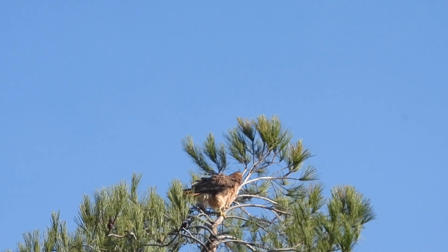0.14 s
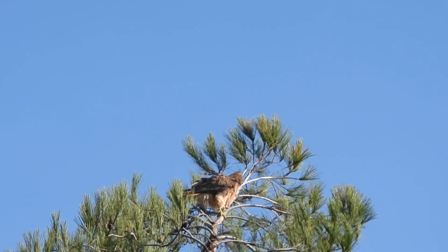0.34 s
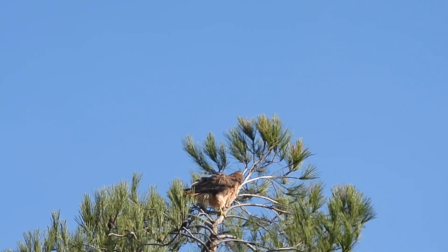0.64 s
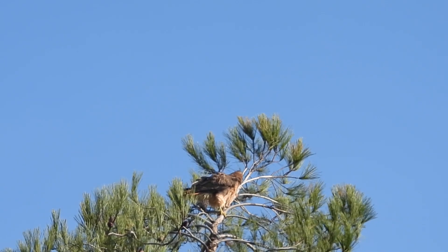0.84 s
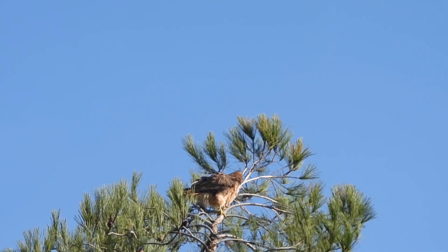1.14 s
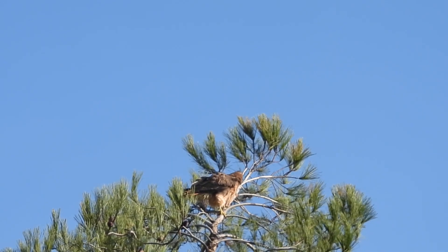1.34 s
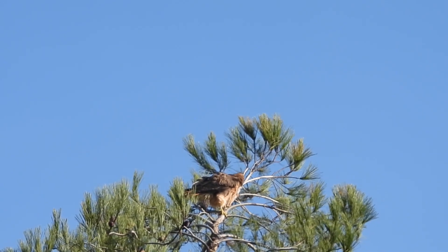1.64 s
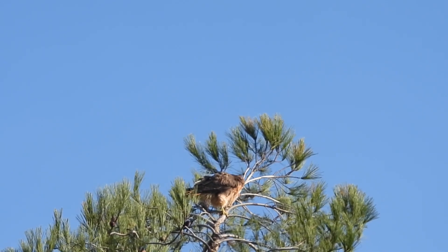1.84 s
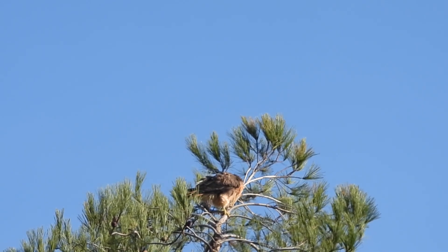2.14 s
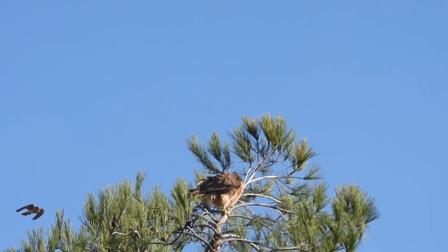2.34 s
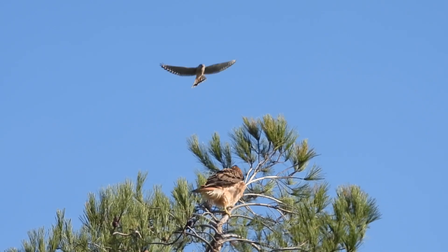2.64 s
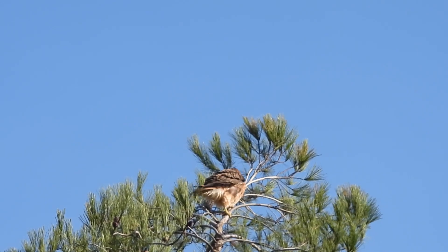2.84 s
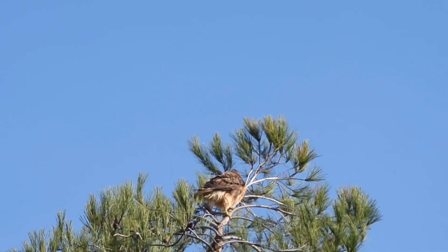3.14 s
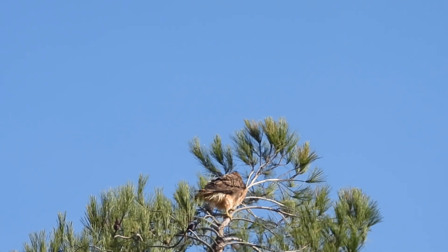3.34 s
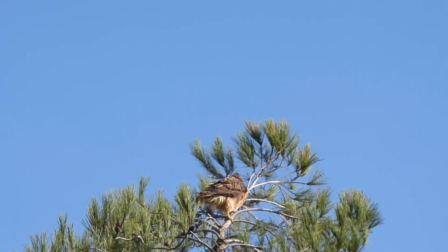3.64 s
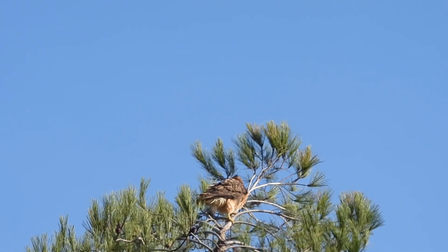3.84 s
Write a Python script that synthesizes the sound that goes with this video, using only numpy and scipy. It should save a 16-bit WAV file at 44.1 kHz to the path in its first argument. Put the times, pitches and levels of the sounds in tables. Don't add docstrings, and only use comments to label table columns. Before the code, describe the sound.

Small falcon calling in fast, shrill two-note phrases after sparse bird chirps, over low wind roar

```python
import sys
import numpy as np
from scipy import signal
from scipy.io import wavfile
from scipy.ndimage import uniform_filter1d

SR = 44100
rng = np.random.default_rng(int(sys.argv[2]) if len(sys.argv) > 2 else 0)


def pcm_store(signal):
    levels = np.round(np.clip(np.atleast_2d(signal), -1, 1) * 32767)
    wavfile.write(sys.argv[1], SR, levels.astype(np.int16).T)


def magnitude_from_level(level_db):
    exponent = np.asarray(level_db, float) / 20
    return 10 ** exponent


N = 176400
ROUGH_JITTER = 0.028


def in_time(rows):
    s, *columns = np.transpose(rows)
    return [np.interp(np.arange(N) / SR, s, c) for c in columns]


def at_hz(points, hz):
    table_hz, value = np.transpose(points)
    return np.interp(np.log(hz), np.log(table_hz), value)


def rms_one(x):
    return x / np.sqrt(np.mean(x ** 2) + 1e-20)


def pan(db):
    return magnitude_from_level(np.array([[.5], [-.5]]) * db)


def drift(rate_hz):
    r = np.exp(-2 * np.pi * rate_hz / SR)
    return rms_one(signal.lfilter([1], [1, -2 * r, r * r], rng.standard_normal(N + SR))[SR:])


def gate(t, start, end, attack_s, release_s):
    return np.clip((t - start) / attack_s, 0, 1) * np.clip((end - t) / release_s, 0, 1)


def resonate(x, hz, width_hz):
    r = np.exp(-np.pi * width_hz / SR)
    return signal.lfilter([1, 0, -1], [1, -2 * r * np.cos(2 * np.pi * hz / SR), r * r], x) * (1 - r * r) / 2


def lowpass(x, hz):
    return signal.sosfilt(signal.butter(2, hz, fs=SR, output="sos"), x)


def banded_noise(spectrum, patchy_db, rate, together):
    # (frequency [Hz], correlation [-1..1])
    likeness = [(60, 0.98), (180, 0.97), (540, 0.86), (1610, 0.79), (4800, -0.42), (14400, 0.13)]
    out = 0
    band_edges = 35 * 2 ** np.arange(0, 8.9, 1 / 2.5)
    white = rng.standard_normal((2, 2, N))
    gust = drift(2.5)
    flicker = [drift(rate) for _ in range(4)]
    for k, (low, high) in enumerate(zip(band_edges, band_edges[1:])):
        band = signal.butter(2, [low, high], "band", fs=SR, output="sos")
        mid, side = signal.sosfilt(band, white[k % 2])
        hz = np.sqrt(low * high)
        alike = np.clip(at_hz(likeness, hz), -1, 1)
        stereo = np.sqrt(1 + alike) * mid + np.sqrt(1 - alike) * side * [[1], [-1]]
        level_db = at_hz(spectrum, hz) + patchy_db * (together * gust + flicker[k % 4])
        out = out + magnitude_from_level(level_db) * stereo
    return rms_one(out)


def glides(rows, jitter, hoarse):
    out, t = np.zeros(N), np.arange(N) / SR
    rasp = drift(290)
    shake = 1 + jitter * drift(198.0)
    for k, (s, length, from_hz, to_hz, level_db) in enumerate(rows):
        u = np.clip((t - s) / length, 0, 1)
        phase = 2 * np.pi * np.cumsum((from_hz + (to_hz - from_hz) * u) * shake) / SR
        swell = np.sin(np.pi * u) ** 0.33
        broken = 1 - hoarse + hoarse * np.roll(rasp, k * SR // 10)
        out += magnitude_from_level(level_db + 9.5) * swell * broken * np.sin(phase)
    return out


def echo(x, t60, level_db):
    start_s, cut_hz = 0.0014, 16300
    t = np.arange(SR) / SR
    tail = rng.standard_normal((2, SR)) * magnitude_from_level(-60 * t / t60) * np.clip(t / start_s - 1, 0, 1)
    tail = tail / np.sqrt(np.sum(tail ** 2) / 2)
    shimmer_db = 3 * drift(70)
    returns = signal.fftconvolve(lowpass(x, cut_hz)[None], tail, axes=1)[:, :N]
    return magnitude_from_level(level_db + shimmer_db) * returns


def arch_note(row, t):
    top_at, rise, fall = .45, .08, .11
    flutter_hz, flutter_from = 230, .62
    s, length, hz = row[:3]
    u = (t - s) / length
    rising = rise * (1 - u / top_at) ** 2
    falling = fall * ((u - top_at) / (1 - top_at)) ** 2
    bend = np.where(u < top_at, rising, falling)
    beat = np.sin(np.pi * flutter_hz * (t - s - flutter_from * length)) ** 2
    flutter = 1 - np.clip((u - flutter_from) * 6, 0, 1) * .8 * beat
    swell = np.interp(u, [0, .3, .6, 1], [0.55, 0.75, 1, 0.46])
    envelope = gate(t, s, s + length, 0.0019, 0.0035) * swell * flutter
    shake = .004 + ROUGH_JITTER * np.clip(4 * u - 3, 0, 1)
    return hz * (1 - np.minimum(bend, .3)), envelope, shake


def hold_note(row, t):
    climb_s, flip_s, drop_s = .015, .0015, .008
    climb_from_hz, climb_to_hz, drop_to_hz = 2330, 2600, 2250
    climb_db, drop_db, drop_end_db = -5, -9, -6
    s, length, hz = row[:3]
    sagged_hz = hz * (1 - .012)
    at = s + np.array([-climb_s, -flip_s, 0, 0.35 * length, length, length + flip_s, length + drop_s])
    pitch = np.interp(t, at, [climb_from_hz, climb_to_hz, sagged_hz, hz, sagged_hz, climb_to_hz, drop_to_hz])
    level_db = np.interp(t, at, [climb_db + 4.5, climb_db, -.8, 0, -1.5, drop_db, drop_end_db])
    steady, rough = .004, ROUGH_JITTER
    shake = np.interp(t, at, [.5 * rough, 0.19 * rough, steady, steady, steady, .5 * rough, rough])
    return pitch, magnitude_from_level(level_db) * gate(t, at[0], at[-1], 0.0037, 0.0013), shake


def squeak(row, t):
    s, length, from_hz, to_hz = row[:4]
    pitch = from_hz + (to_hz - from_hz) * np.clip((t - s) / length, 0, 1)
    return pitch, gate(t, s, s + length, 0.0011, 0.0013), 0.34 * ROUGH_JITTER


def falcon():
    # (start [s], length [s], top pitch [Hz], level [dB], pan [dB])
    arches = [
        (2.895, 0.049, 2512, -12, 2.5),
        (3.253, 0.041, 2556, -15, 2.5),
        (3.431, 0.043, 2414, -18, 1.5),
        (3.602, 0.032, 2382, -16, -2.5),
        (3.77, .043, 2370, -14.5, -2),
        (3.951, 0.035, 2344, -14, 2),
    ]
    # (flip [s], hold [s], held pitch [Hz], level [dB], pan [dB])
    holds = [
        (2.962, 0.035, 2851, -15.5, -2),
        (3.09, 0.016, 2900, -15.5, -2),
        (3.138, 0.033, 2880, -16.5, -2.1),
        (3.316, 0.031, 2863, -17, -1),
        (3.495, 0.023, 2852, -16.5, 1.5),
        (3.664, .025, 2850, -15.5, 5.5),
        (3.845, 0.011, 2827, -20, -3),
        (4.008, 0.058, 2700, -22.5, 7.5),
    ]
    # (start [s], length [s], from [Hz], to [Hz], level [dB])
    squeaks = [(2.94, 0.0079, 2920, 2750, -29.5), (3.077, 0.01, 2400, 2600, -25),
               (3.11, 0.0174, 2453, 2180, -26), (3.291, 0.019, 3050, 3290, -26),
               (3.288, .014, 2420, 2530, -34), (3.471, 0.0143, 2980, 3240, -24.5),
               (3.64, 0.014, 3060, 3160, -23.5), (3.636, 0.022, 2160, 2350, -27),
               (3.814, 0.0148, 2250, 2630, -20), (3.828, 0.0077, 2800, 3240, -17.5),
               (3.837, 0.0102, 3190, 2870, -18), (3.843, 0.021, 2422, 2320, -23.5),
               (3.992, 0.0089, 3100, 3300, -21)]
    # (start [s], length [s], from [Hz], to [Hz], level [dB])
    breaks = [(3.076, .006, 5900, 6100, -38), (3.255, .007, 5900, 6150, -32),
              (3.244, .007, 3500, 3650, -47), (3.434, .006, 5800, 6000, -36),
              (3.424, .006, 3500, 3600, -46), (2.934, .012, 3200, 3600, -43),
              (3.283, .016, 3050, 3700, -45), (3.461, .014, 3000, 3750, -45),
              (3.632, .014, 3000, 3900, -44), (3.98, .006, 3600, 3250, -40), (3.985, .008, 3250, 3950, -39),
              (3.62, .006, 3600, 3300, -48), (3.795, .006, 3600, 3300, -48), (3.812, .007, 2900, 3700, -46)]
    # (frequency [Hz], level [dB])
    throat = [(2300, -22), (3200, -16), (4300, -3), (5700, 1), (7300, -16), (8600, -22), (9800, -22.5),
              (11300, -46.5)]
    tone_lead_s, low_pan_db = .0105, 4.5
    out, effort = np.zeros((2, N + SR)), np.zeros(N + SR)
    jitter, wobble, air = drift(224), drift(73), drift(1000)
    fray = np.array([drift(200), drift(250)])
    for voice, rows in ((arch_note, arches), (hold_note, holds), (squeak, squeaks)):
        for row in rows:
            i = int((row[0] - .05) * SR) + np.arange(SR // 8)
            level_db, pan_db = (row[4], 0) if voice is squeak else row[3:5]
            pitch, shape, shake = voice(row, i / SR)
            phase = 2 * np.pi * np.cumsum(pitch * (1 + shake * jitter[i % N])) / SR
            unsteady = magnitude_from_level(.7 * wobble[i % N]) + magnitude_from_level(-37) * air[i % N] * 4
            level = shape * unsteady * magnitude_from_level(level_db + 2.0)
            effort[i] += shake / ROUGH_JITTER * shape * magnitude_from_level(level_db)
            for k in range(1, 6):
                lowest = k == 1
                upper = max(k - 2, 0)
                frail = shape ** (.5 * upper) * magnitude_from_level(1.8 * upper * fray[:, (i + 999 * k) % N])
                side = pan(pan_db) * pan(low_pan_db * lowest)
                partial = level * frail * magnitude_from_level(at_hz(throat, k * pitch)) * np.sin(k * phase)
                out[:, i - int(tone_lead_s * SR) * lowest] += side * partial
    rasp_colour = [(1500, -60), (3500, -34), (5000, 2), (7000, 1), (10000, -14), (15000, -50)]   # (Hz, dB)
    rasp = banded_noise(rasp_colour, patchy_db=4.0, rate=60.0, together=0.33)
    rasp_level = magnitude_from_level(-27 + 12.5) * uniform_filter1d(effort[:N], int(.008 * SR))
    out = out[:, :N] + glides(breaks, jitter=0.00823, hoarse=0.21) + rasp_level * rasp
    return pan(0.5) * (out + echo(out.mean(axis=0), t60=0.39, level_db=-5))


def chirps():
    # (start [s], length [s], from [Hz], to [Hz], level [dB])
    chirp_rows = [(0.422, 0.06, 3400, 4310, -57.5), (0.455, 0.038, 3850, 3030, -49.5),
                  (.484, 0.02, 3100, 2250, -54), (0.504, 0.017, 3650, 4430, -37.5),
                  (.479, 0.02, 3550, 3860, -48), (0.519, 0.011, 3800, 3940, -33.5),
                  (.496, 0.021, 2950, 3480, -48), (.503, 0.0094, 4700, 4400, -47),
                  (.528, 0.02, 3600, 3250, -51), (.534, 0.023, 2650, 2450, -58),
                  (.542, 0.014, 3600, 4100, -55), (0.897, 0.031, 3100, 4270, -57.5),
                  (0.916, 0.037, 3910, 3826, -47.5), (.948, 0.034, 3870, 4400, -56),
                  (1.515, 0.031, 2900, 2840, -41), (1.51, 0.11, 3560, 3600, -51),
                  (1.8, 0.027, 3500, 4000, -61), (1.826, 0.03, 3900, 4760, -57),
                  (1.843, 0.054, 3300, 3394, -57), (1.868, 0.038, 2950, 3260, -57),
                  (2.0, 0.048, 3750, 3640, -65), (1.57, 0.081, 2900, 2885, -53.5),
                  (2.402, 0.021, 4800, 5700, -49.5), (2.424, 0.021, 5700, 7560, -49.5),
                  (2.024, 0.028, 5600, 4840, -64), (2.15, 0.11, 4800, 5000, -72),
                  (1.235, .04, 3850, 3950, -60), (2.452, .012, 4000, 4400, -44),
                  (2.384, .014, 3800, 4030, -57), (2.393, 0.029, 2400, 3090, -41),
                  (2.398, 0.034, 3160, 3500, -42), (2.42, 0.018, 3250, 3840, -27),
                  (2.443, 0.015, 3750, 4030, -34.5)]
    return glides(chirp_rows, jitter=0.00976, hoarse=0.25)


def twig_ticks():
    # (time [s], resonance [Hz], level [dB])
    tick_rows = [
        (.298, 2650, -29.5),
        (.307, 5070, -33),
        (1.673, 5700, -34.5),
        (1.998, 7460, -54),
    ]
    out = np.zeros(N)
    for s, hz, level_db in tick_rows:
        impulse = (np.arange(N) == int(s * SR)) + 1e-18
        out += magnitude_from_level(level_db + 23.0) * resonate(resonate(impulse, hz, 0.11 * hz), hz, 0.59 * hz)
    return out


def harsh_buzz(hiss):
    # (time [s], level [dB])
    buzz_level = [
        (1.25, -64),
        (1.3, -41),
        (1.35, -33),
        (1.42, -32.5),
        (1.491, -31.5),
        (1.539, -29),
        (1.585, -48),
        (1.68, -57),
        (1.78, -73),
    ]
    # (start [s], length [s], from [Hz], to [Hz], level [dB])
    streaks = [(1.27, 0.1, 2500, 2900, -45), (1.26, 0.086, 2900, 4200, -49), (1.28, .14, 1800, 2250, -49.5),
               (1.33, .1, 3400, 4450, -41), (1.42, 0.09, 4400, 4950, -38.5),
               (1.3, 0.066, 2600, 3100, -47.5), (1.385, 0.054, 6700, 5800, -41.5),
               (1.385, 0.026, 8100, 8530, -45.5), (1.31, 0.096, 8300, 7200, -46),
               (1.499, 0.0744, 5800, 6000, -39.5), (1.535, 0.04, 3700, 4800, -35.5)]
    t = np.arange(N) / SR
    level_db, = in_time(buzz_level)
    rasp = hiss * magnitude_from_level(0.5 * drift(70))
    buzz = magnitude_from_level(level_db) * gate(t, buzz_level[0][0], buzz_level[-1][0], .01, .01) * rasp
    return pan(1.5) * (buzz + glides(streaks, jitter=.007, hoarse=.7))


def rustle(hiss):
    # (start [s], length [s], level [dB])
    puffs = [
        (0.28, 0.08, -51.5),
        (0.461, 0.1, -54.5),
        (1.956, .06, -69),
        (2.395, 0.077, -47.5),
    ]
    t = np.arange(N) / SR
    level = sum(magnitude_from_level(db) * gate(t, s, s + length, 0.28 * length, 0.4 * length) for s, length, db in puffs)
    return np.diff(hiss, prepend=0) * level


def small_birds():
    # (frequency [Hz], density [dB per Hz])
    buzz_colour = [(1060, -37), (1800, -18.5), (2790, -10), (4500, -1.5), (5130, 9), (6000, -4),
                   (8590, -12.5), (14500, -66)]
    hiss = banded_noise([*buzz_colour, (15000, -70)], patchy_db=1.8, rate=25.0, together=0.3)
    out = chirps() + twig_ticks()
    buzz = harsh_buzz(hiss)
    returns = echo(out + buzz.mean(axis=0), t60=0.29, level_db=-5.5)
    return out + buzz + rustle(hiss) + returns


def wind_and_traffic():
    # (time [s], level [dB])
    wind_level = [
        (0, -46),
        (.97, -46),
        (2.0, -44.5),
        (2.43, -45),
        (2.8, -45),
        (2.91, -44),
        (3.22, -51),
        (3.5, -48.5),
        (4, -46.5),
    ]
    # (time [s], left over right [dB])
    wind_pan = [(0, -1), (.9, -0.7)]
    # (frequency [Hz], density [dB per Hz])
    roar = [(40, -95), (113, -15.5), (291, -5.5), (560, -6), (1050, -4.5), (3120, -28.5), (4820, -20.5),
            (13000, -72)]
    level_db, = in_time(wind_level)
    pan_db, = in_time(wind_pan)
    noise = banded_noise(roar, patchy_db=1.1, rate=4.0, together=.3)
    return lowpass(magnitude_from_level(level_db + 2.5) * pan(pan_db) * noise, 8000)


def narrow_noise(hz, width_hz):
    return rms_one(resonate(resonate(rng.standard_normal(N), hz, width_hz), hz, width_hz))


def drone_and_hums():
    # (time [s], level [dB])
    drone_level = [
        (0, -55),
        (1.69, -59.5),
        (2.04, -47.5),
        (2.6, -46.5),
        (3.17, -51),
        (3.45, -42.5),
        (3.65, -50),
        (3.8, -43.5),
        (4, -46.5),
    ]
    # (frequency [Hz], level [dB], from [s], to [s])
    hums = [
        (192.1, -62, -4, 3.5),
        (699, -51, -3, 0.464),
        (450, -54, 2.7, 3.55),
        (1500, -55, .05, .3),
    ]
    t = np.arange(N) / SR
    drone_db, = in_time(drone_level)
    out = magnitude_from_level(drone_db - 1.5) * narrow_noise(315.2, 23.2)
    for hz, level_db, start, end in hums:
        out = out + magnitude_from_level(level_db) * narrow_noise(hz, 0.04 * hz) * gate(t, start, end, .08, 0.068)
    return out


def scene():
    return falcon() + small_birds() + wind_and_traffic() + drone_and_hums()


def top_cut(x):
    return signal.sosfilt(signal.butter(12, 14970, fs=SR, output="sos"), x)


def record(dry):
    mix = signal.sosfilt(signal.cheby2(10, 50, 14900, fs=SR, output="sos"), dry)
    return top_cut(mix)


dry = scene()
out = record(dry)
pcm_store(out)
```